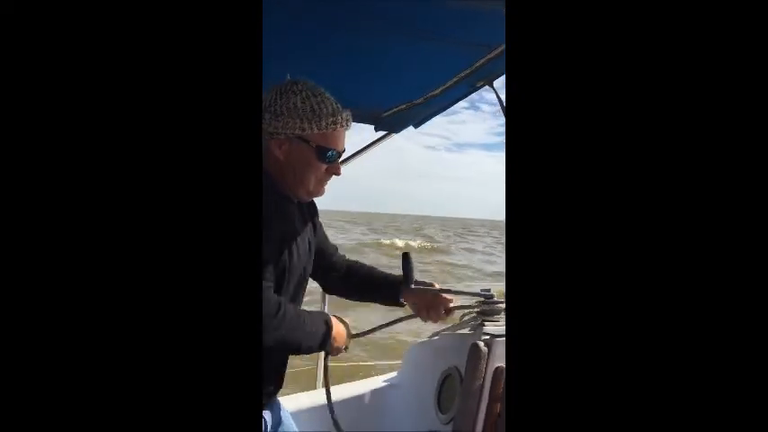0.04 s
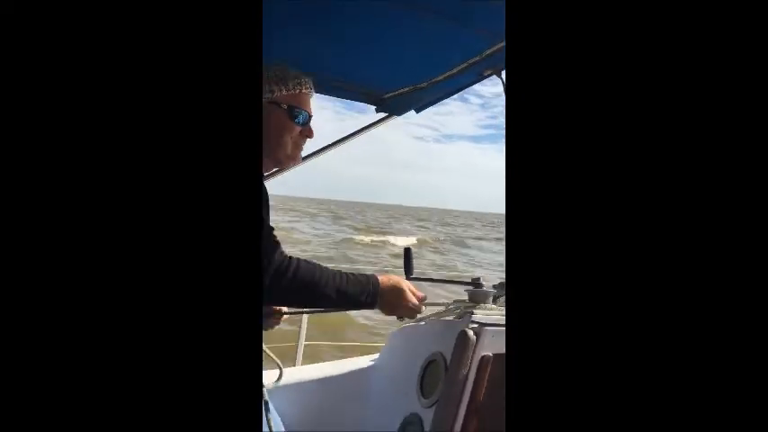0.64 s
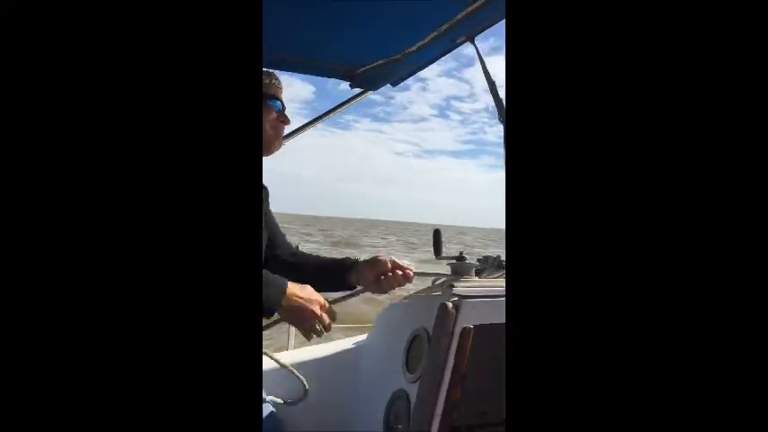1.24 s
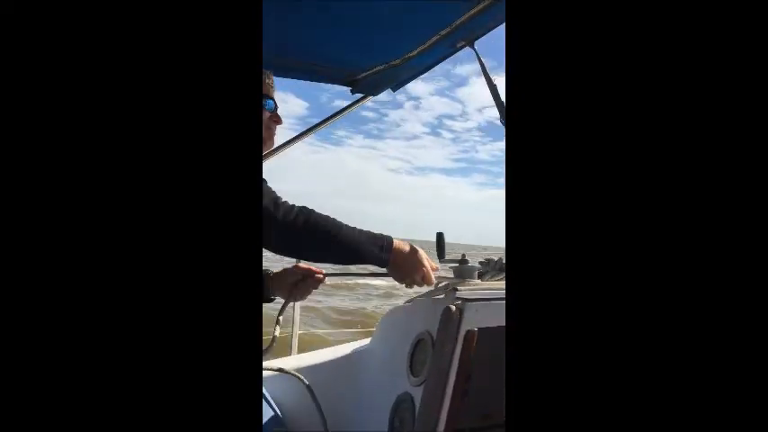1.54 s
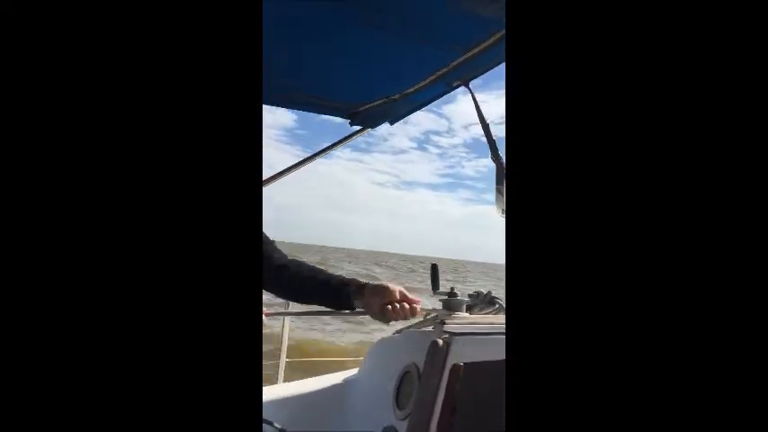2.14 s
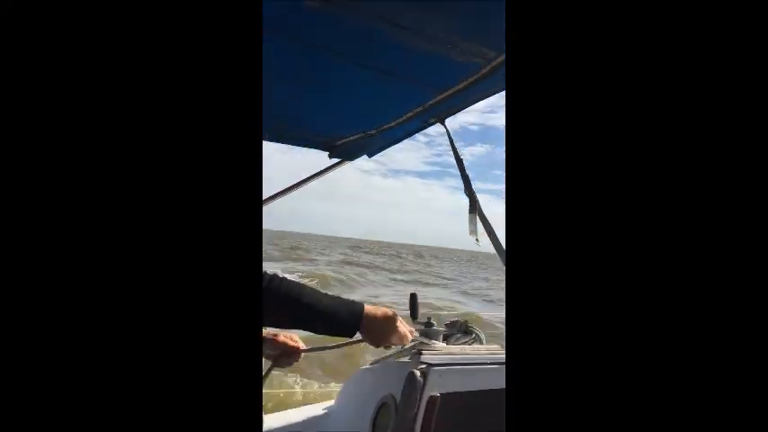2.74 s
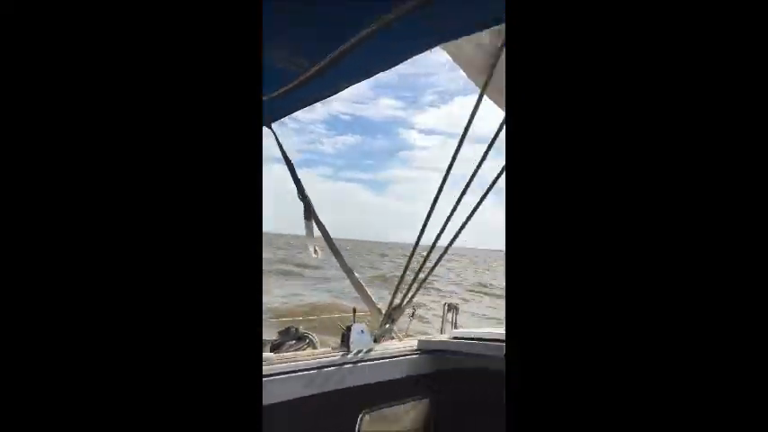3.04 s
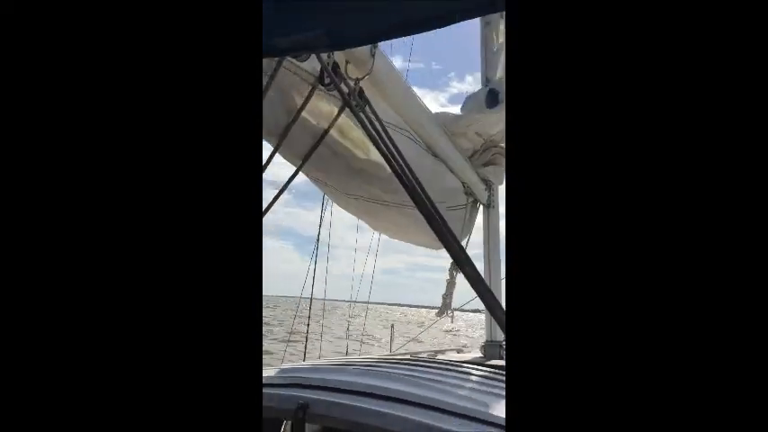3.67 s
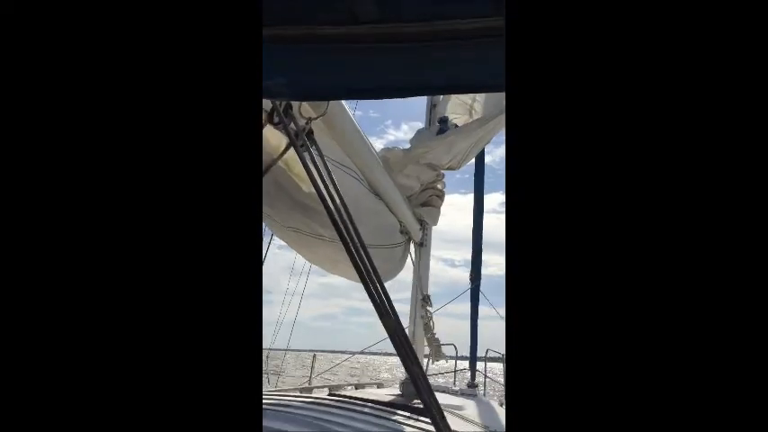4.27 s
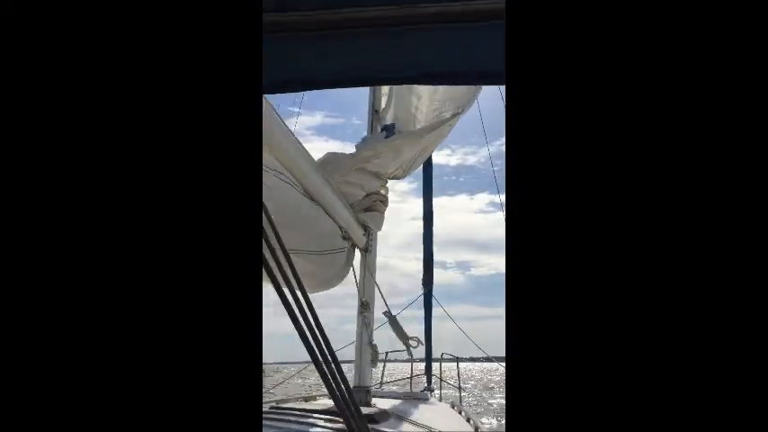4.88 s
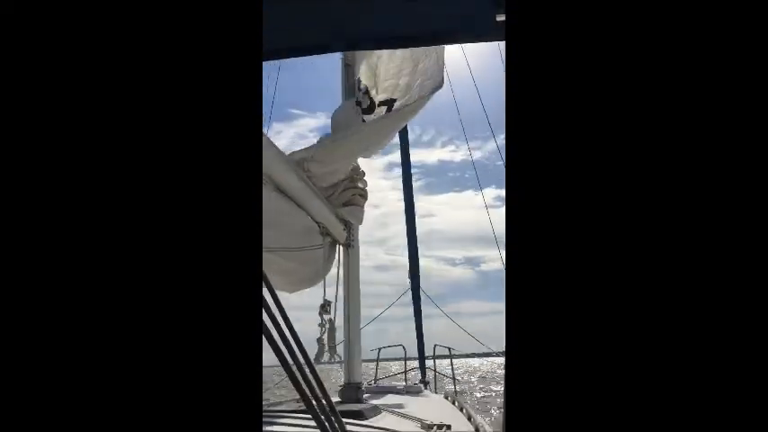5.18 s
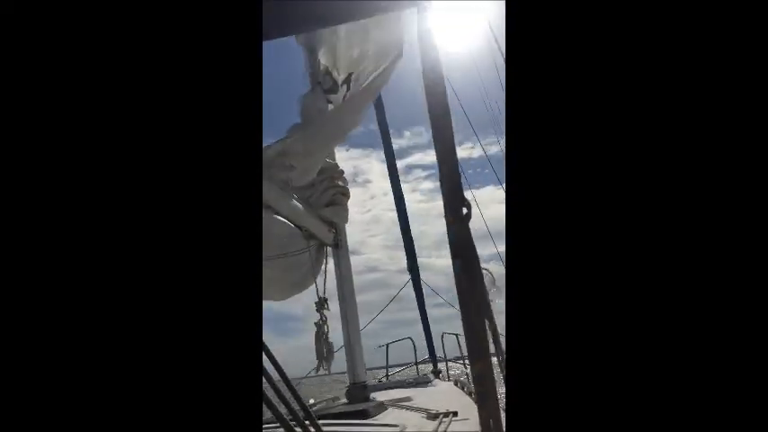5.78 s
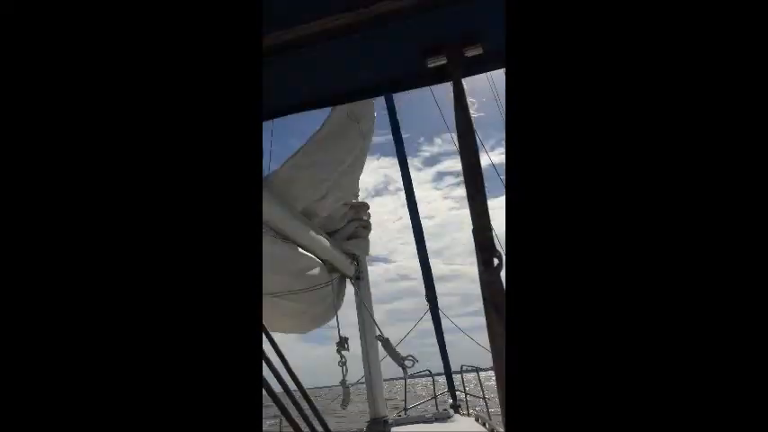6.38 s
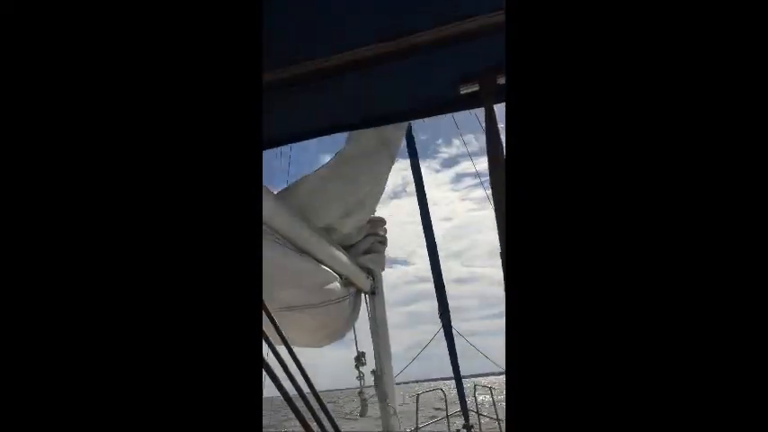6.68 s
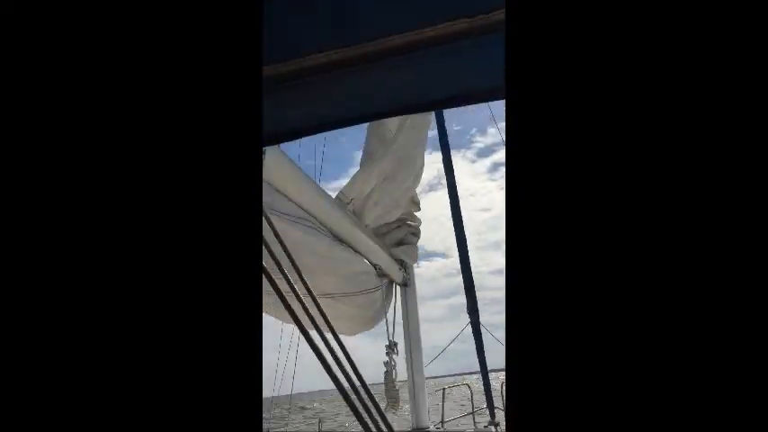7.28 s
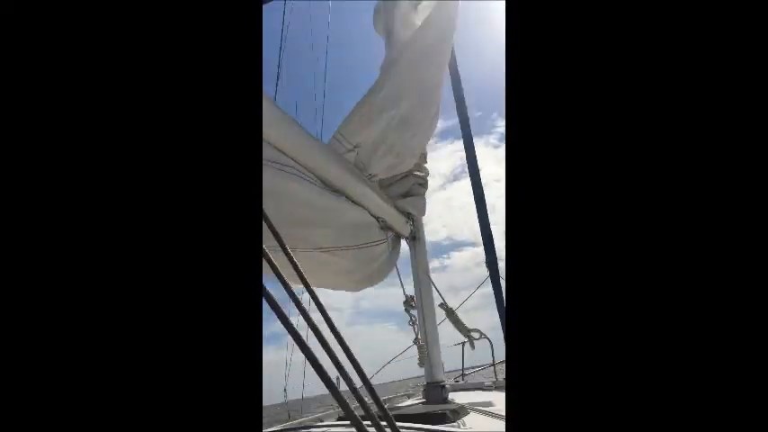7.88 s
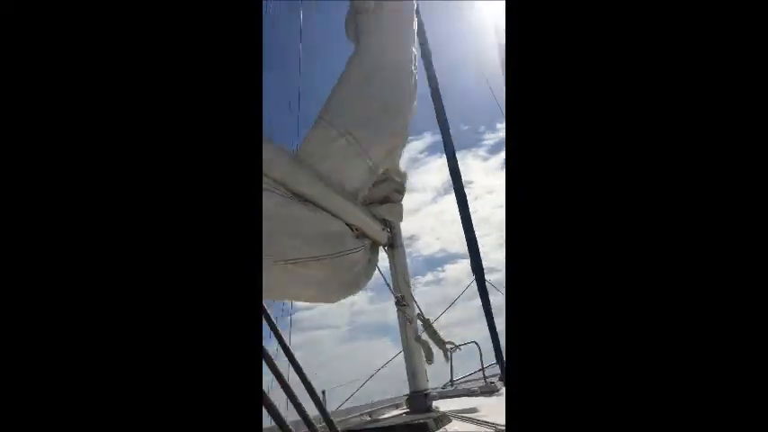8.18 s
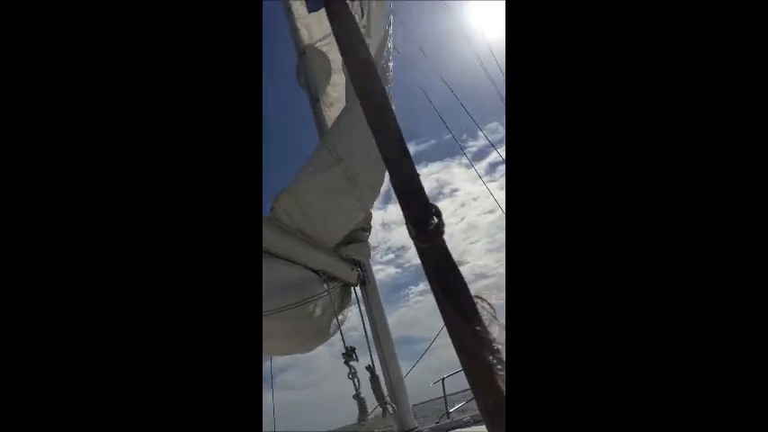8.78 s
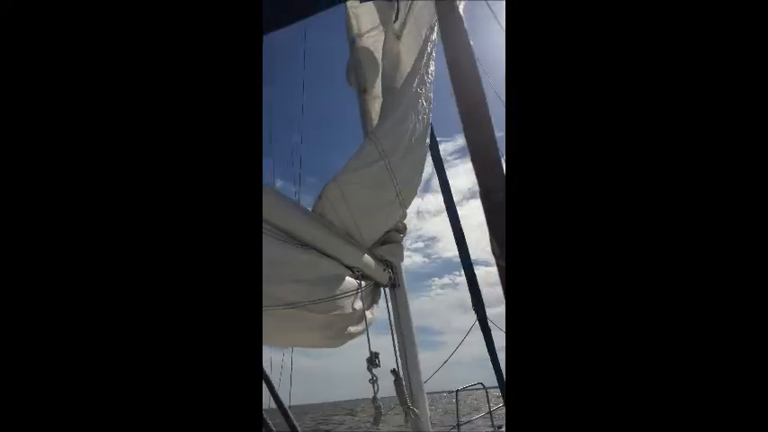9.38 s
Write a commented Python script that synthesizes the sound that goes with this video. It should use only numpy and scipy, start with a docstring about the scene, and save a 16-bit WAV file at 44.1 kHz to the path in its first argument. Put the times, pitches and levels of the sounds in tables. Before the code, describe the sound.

Repeated high, pitch-bending squeaks of a line hauled round a winch, above steady wind rumble, water wash and a slow boat engine.

```python
"""Hauling a line round a winch

A line is hauled hand over hand in the cockpit of a motoring sailboat. On each pull the rope creaks on
the drum and stick-slip makes it squeal, sagging in pitch under load; single slips tick between pulls.
Underneath, water thumps the hull and the inboard engine throbs at low revs in a wash of wind and water.
An automatic gain control sinks under the loud squeals and slowly recovers."""
import sys
import numpy as np
from scipy import signal
from scipy.fft import rfft, irfft, next_fast_len
from scipy.io import wavfile
from scipy.ndimage import uniform_filter1d

SR = 44100
rng = np.random.default_rng(int(sys.argv[2]) if len(sys.argv) > 2 else 0)


def wrap_up_sound(samples):
    """Save the sound to the file named by the first command line argument, as 16-bit audio."""
    columns = np.atleast_2d(samples).T
    # keep every value between -1 and 1, then stretch to whole-number steps
    tamed = np.clip(columns, -1, 1)
    steps = np.round(tamed * 32767).astype(np.int16)
    wavfile.write(sys.argv[1], SR, steps)


N = 415422
T = np.arange(N) / SR

# Pulls on the rope. load_curve above 1 brings the load on late; fade_db is lost by the pull's end.
# start_s, length_s, first_hz, loaded_hz, load_s, last_hz, load_curve,
# squeal_db, fade_db, shriek_s, shriek_half_width_s, shriek_db, creak_db
PULLS = [(0.44, 0.38, 2613, 2560, 0.32, 2597.0, 0.89, -20, 13.5, 0.21, 0.056, 8, -30.9),
         (1.051, 0.37, 3028, 2599, 0.24, 2952.0, 0.63, -18.5, 5.5, 0.057, 0.079, 10, -35),
         (1.47, 0.38, 3070, 2660, 0.24, 2561.0, 0.66, -14, 14.5, 0.055, 0.052, 10, -31.5),
         (1.96, 0.39, 2975.0, 2603.0, 0.22, 2915.0, 0.62, -15.5, -0.5, 0.22, 0.07, 3.5, -30.5),
         (2.422, 0.35, 3105.0, 2725, 0.26, 3000.0, 0.59, -11.5, 2.0, 0.095, 0.014, -1.5, -32.5),
         (3.06, 0.35, 3111, 2590, 0.3, 2756.0, 2.2, -17.5, -1.5, 0.096, 0.07, 14, -35.5),
         (3.63, 0.42, 3093, 2480, 0.29, 2782.0, 1.2, -9, 3, 0.071, 0.05, 5.5, -31.0),
         (5.111, 0.43, 3109, 2693, 0.3, 2915.0, 1.15, -5.5, 0.5, 0.044, 0.059, 2.5, -31.5),
         (6.044, 0.365, 3290, 2575, 0.4, 2497.0, 0.68, -12, 7, 0.18, 0.165, 14, -26),
         (7.055, 0.43, 3118, 2770, 0.34, 2979.0, 1.31, -5.5, 2.5, 0.079, 0.049, 11, -31.5),
         (8.196, 0.29, 3173.0, 2942, 0.2, 3130.0, 1.55, 7, 4, 0.029, 0.094, -6, -33.5),
         (9.139, 0.16, 3232, 3050, 0.098, 3041.0, 2.8, -14, 7, 0.059, 0.014, 10.5, -41)]
def hauling(lead_s=.02, ease_s=.02, lock_s=.004, attack_db_per_s=1449, release_db_per_s=359,
            creak_load_db=6, creak_edge_s=.026, lowest_hz=2555):
    """Load builds and eases in each pull, bending the pitch and shaping the squeal and creak levels."""
    pulls = np.array(PULLS)
    which = np.maximum(np.searchsorted(pulls[:, 0] - lead_s, T) - 1, 0)
    (start_s, length_s, first_hz, loaded_hz, load_s, last_hz, load_curve,
     squeal_db, fade_db, shriek_s, shriek_half_width_s, shriek_db, creak_db) = pulls[which].T
    t = T - start_s
    built = ease(np.clip(t / load_s, 0, 1) ** load_curve)
    eased = ease((t - load_s) / np.maximum(length_s + ease_s - load_s, ease_s))
    jolt_db, jolt_hz = jolts()
    pitch_hz = first_hz + (loaded_hz - first_hz) * built + (last_hz - loaded_hz) * eased + jolt_hz
    swell_db = shriek_db * np.exp(-((t - shriek_s) / shriek_half_width_s) ** 2)
    faded_db = fade_db * np.clip(t / length_s, 0, 1) ** 4
    edge_db = attack_db_per_s * np.maximum(lock_s - t, 0) + release_db_per_s * np.maximum(t - length_s, 0)
    squeal_db = squeal_db + swell_db - faded_db + jolt_db - edge_db
    # the creak grows with the load and gives way as the tone locks into a shriek
    creak_db = creak_db + creak_load_db * built * (1 - eased) - .35 * swell_db
    moving = np.clip(np.minimum(t, length_s - t) / creak_edge_s + 1, 0, 1)
    return np.maximum(pitch_hz, lowest_hz), squeal_db, creak_db, moving


# Jolts in the squeal: time_s, jump_db, jump_hz
JOLTS = [(1.479, 3, 62.5), (1.62, 2.5, 179), (2.508, 8, 3), (3.251, 11, 0), (3.303, 15.5, -200),
         (3.719, 15.5, 2), (3.82, -5, -100), (5.114, 9, 139), (5.18, 8, 70.5), (5.256, 12, -60),
         (5.497, 9.5, 155), (6.113, 8.5, -260), (6.245, 10, 145), (6.345, -1, -220), (7.075, 8.5, 0.5),
         (7.205, 7, 0), (7.335, -6.5, -120), (7.435, 17, 297), (8.222, 6, -110), (9.192, 1.5, -0.5)]
def jolts(level_settle_s=.019, pitch_settle_s=.0456):
    """Level and pitch lean one way as the rope binds, snap over as it lets go, and settle."""
    db, hz = np.zeros(N), np.zeros(N)
    for time_s, jump_db, jump_hz in JOLTS:
        t = T - time_s
        db += jump_db / 2 * np.sign(t) * np.exp(-np.abs(t) / level_settle_s)
        hz += jump_hz / 2 * np.sign(t) * np.exp(-np.abs(t) / pitch_settle_s)
    return db, hz


def squeal(pitch_hz, level_db, creak_db, hoarse_db=-13, split_db=-13.5, gain_db=1):
    """Stick-slip locks into a tone; the stronger the creak beside it, the more it stutters and wavers."""
    rough = np.clip((creak_db - level_db + 39) / 23, .06, 1)
    dropout, grip = stutter()
    waver = .008 * rough * grip + .004 * np.sqrt(rough) * drift(45)
    phase = 2 * np.pi * np.cumsum(pitch_hz * (1 + waver)) / SR
    # the tone fades and swells irregularly in strength and phase, the more so the rougher it is
    beating = .85 * rough
    tone = (1 + beating * flutter(55)) / np.sqrt(1 + beating ** 2) * np.exp(1j * phase)
    # under heavy creak other turns break in briefly, about a semitone above and below
    above, below = np.exp(1.075j * phase), np.exp(.955j * phase)
    tone += from_db(split_db) * rough ** 2 * (flutter(30) * above + .3 * flutter(30) * below)
    tone *= 1 + from_db(hoarse_db) * rough * flutter(200)
    tone *= 1 - np.minimum(2.8 * rough, .75) * dropout
    # the low, heavily loaded part of a pull has a rasping octave; the high part is nearly pure
    octave_db = np.interp(pitch_hz, [2550, 2800, 3100], [-14, -23, -32])
    rasp = .6 + .8 * np.sqrt(rough) * flutter(150)
    octave = from_db(octave_db) * np.abs(tone) * np.exp(2j * phase) * rasp
    envelope = uniform_filter1d(from_db(level_db + gain_db), size=128)
    return np.sqrt(2) * envelope * np.real(tone + octave)


def stutter(per_s=32, catch_s=.0027):
    """Now and then the rope catches: a brief dropout (0-1), then a new grip, held to the next catch."""
    at = slip_samples(per_s, uneven=.5)
    now = np.arange(N)
    which = np.minimum(np.searchsorted(at, now), len(at) - 1)
    gap_s = np.minimum(np.abs(at[which] - now), np.abs(at[which - 1] - now)) / SR
    grip = rng.standard_normal(2000)[which]
    return np.exp(-(gap_s / catch_s) ** 2), grip


def slip_samples(per_s, uneven):
    """Samples at which the rope lets go, unevenly spaced."""
    gaps = np.exp(uneven * rng.standard_normal(2000))
    at = (np.cumsum(gaps) / per_s * SR).astype(int)
    return at[at < N]


# Bright rasp of rope fibres, for creaks and ticks: frequency_hz, relative_db
ROPE_EQ = [(300, -29.5), (1000, -17.5), (2100, -12.5), (2700, -7), (3400, 1), (4100, -3), (4900, -12),
           (6700, -15), (8000, -23), (9500, -23.5), (12000, -34), (13500, -29), (15200, -24.5)]
def creak(level_db, slips_per_s=66, spread_db=4, rub_db=-10, t60_s=.038, gain_db=4):
    """The rope creeps in uneven jerks, each a brief burst of snapping fibres, over a steady rub."""
    at = slip_samples(slips_per_s, uneven=.45)
    slips = np.zeros(N)
    slips[at] = from_db(spread_db * np.clip(rng.standard_normal(N)[at], -2, 1.4))
    envelope = rms_one(decay(slips, t60_s)) + from_db(rub_db)
    fibres = rms_one(envelope * rng.standard_normal(N))
    return from_db(level_db + gain_db) * colour(fibres, ROPE_EQ)


# Single slips of the rope: start_s, relative_db
TICKS = [(0.0983, -23), (0.343, -12), (0.395, -13.5), (0.9038, -15.5), (0.959, -16.5), (0.9734, -17),
         (1.0095, -12), (1.1783, -7), (1.2764, -31), (1.4529, -13), (1.8525, -14), (1.9028, -10.5),
         (2.4279, -28), (2.5052, -13), (2.661, -16), (3.0684, -15), (3.2251, -8.5), (3.2543, -6),
         (3.6127, -8), (4.2564, -17), (5.0584, -15), (5.737, -16.5), (5.7664, -19), (6, -17),
         (6.4826, -15.5), (6.5854, -17), (6.6391, -13), (6.7344, -19.5), (6.9829, -14.5), (7.7614, -16),
         (8.1338, -15.5), (8.167, -16), (9.0528, -13.5)]
def ticks(t60_s=.023, gain_db=-3, snap=2.9):
    """Lone slips as the rope takes up or loses load: one snap, then a short spray of fibres."""
    slips = from_db(gain_db) * clicks(TICKS)
    spray = decay(slips, t60_s) * rng.standard_normal(N)
    return colour(snap * slips + spray, ROPE_EQ)


# Water hitting the hull: start_s, relative_db
THUMPS = [(0.075, -2.5), (0.099, -19), (5.091, -13.5), (8.179, -17), (8.886, -9), (9.19, -22)]
def hull_thumps(pitch_hz=163, t60_s=.028, gain_db=3):
    """Each blow of water rings one heavily damped mode of the hull."""
    radius, angle = from_db(-60 / (t60_s * SR)), 2 * np.pi * pitch_hz / SR
    blows = from_db(gain_db) * clicks(THUMPS) + 1e-18
    return signal.lfilter([0, -np.sin(angle)], [1, -2 * radius * np.cos(angle), radius ** 2], blows)


def engine_cycle(cycle_hz=14.69, wander=.0029):
    """Phase of the four-stroke cycle, its revs wandering slightly."""
    return 2 * np.pi * np.cumsum(cycle_hz * (1 + wander * drift(1.48))) / SR


# Harmonics of the throb: cycle_multiple, relative_db
ENGINE_ORDERS = [(2, -18.5), (3, -9.5), (4, 2.5), (5, -3), (6, -2), (7, -2), (8, -3), (9, -2.5), (11, -8),
                 (12, -20), (13, -9.5), (14, -12.5), (21, -14.5), (25, -21)]
# Fader for the engine, which is clearest aft: time_s, level_db
ENGINE_FADER = [(0, -23), (2.75, -18), (3.1, -22.5), (5, -22), (9.42, -25.5)]
def engine(cycle, waver=.44):
    """Orders of the four-stroke cycle, carried by the hull; each wavers with the load."""
    throb = np.zeros(N)
    for multiple, db in ENGINE_ORDERS:
        strength = from_db(db) * (1 + waver * drift(8.5))
        throb += strength * np.cos(multiple * cycle + rng.uniform(0, 2 * np.pi))
    return from_db(in_time(ENGINE_FADER)) * rms_one(throb)


# Swells of the wind: time_s, relative_db
GUSTS = [(0, -26.5), (2.7, -26.5), (3.3, -22), (5, -22.5), (6.4, -22), (6.95, -20.5), (7.3, -24.5),
         (8.1, -20.5), (9.42, -25)]
# Bass-heavy tone of the wind: frequency_hz, relative_db
WIND_EQ = [(8, -40.5), (22, -12.5), (35, -28), (55, -2.5), (110, 1), (180, -3), (260, -12.5), (380, -27.5),
           (900, -59), (5000, -89.5)]
def wind(buffet_db=3):
    """A low rumble that buffets quickly within slower gusts."""
    buffeting = rng.standard_normal(N) * from_db(buffet_db * drift(15))
    return from_db(in_time(GUSTS)) * colour(buffeting, WIND_EQ)


# Midrange rush of the water: frequency_hz, relative_db
WASH_EQ = [(200, 2), (330, 5.5), (480, 2), (630, 6.5), (800, -1), (1100, -3), (2100, -3), (3300, 5),
           (3900, -8), (5500, -18), (7500, -35), (8800, -36.5), (9600, -35.5), (11000, -48.5)]
def water_wash(cycle, pulse_depth=.046, flicker_db=1.59, gain_db=-28):
    """A steady wash of water that flickers and pulses slightly with the engine's firings."""
    pulsing = 1 + pulse_depth * np.cos(2 * cycle)   # two firings a cycle
    rush = rng.standard_normal(N) * pulsing * from_db(flicker_db * drift(42))
    return from_db(gain_db) * colour(rush, WASH_EQ)


def from_db(db):
    """Decibels to gain."""
    return 10 ** (np.asarray(db) / 20)


def rms_one(x):
    """Scale to unit rms."""
    return x / np.sqrt(np.mean(np.abs(x) ** 2) + 1e-20)


def in_time(rows):
    """Join (time_s, value) points into a curve at every sample."""
    return np.interp(T, *np.transpose(rows))


def ease(share):
    """Smooth step from 0 to 1."""
    return np.sin(np.pi / 2 * np.clip(share, 0, 1)) ** 2


def drift(rate_hz):
    """Smooth random motion of unit rms, mostly slower than rate_hz."""
    size = next_fast_len(N, real=True)
    hz = np.arange(size // 2 + 1) * SR / size
    spectrum = rfft(rng.standard_normal(size)) / (1 + (hz / rate_hz) ** 2)
    return rms_one(irfft(spectrum, size)[:N])


def flutter(rate_hz):
    """Random motion in both strength and phase, of unit power."""
    return (drift(rate_hz) + 1j * drift(rate_hz)) / np.sqrt(2)


def colour(x, eq, size=8192):
    """Minimum-phase filter with the given EQ curve and unit power gain."""
    hz, level_db = np.transpose(eq)
    grid_hz = np.maximum(np.arange(size // 2 + 1) * SR / size, 1)
    gain = from_db(np.interp(np.log(grid_hz), np.log(hz), level_db))
    cepstrum = irfft(np.log(gain))
    cepstrum[1:size // 2] *= 2
    cepstrum[size // 2 + 1:] = 0
    response = irfft(np.exp(rfft(cepstrum)))
    return signal.fftconvolve(x, response / np.linalg.norm(response))[:N]


def clicks(rows):
    """One click for each (start_s, level_db)."""
    out = np.zeros(N)
    for start_s, level_db in rows:
        out[round(start_s * SR)] = from_db(level_db)
    return out


def decay(x, t60_s):
    """Give each click an exponential tail."""
    return signal.lfilter([1], [1, -from_db(-60 / (t60_s * SR))], x + 1e-18)


def cockpit(x, t60_s, wet_db):
    """The cockpit adds a short, dense tail of reflections."""
    t = T[:SR // 4]
    tail = rng.standard_normal(len(t)) * from_db(-60 * t / t60_s)
    return x + from_db(wet_db) * signal.fftconvolve(x, tail / np.linalg.norm(tail))[:N]


def scene():
    """The rope sounds a step away, over a bed of wind, water and engine."""
    pitch_hz, squeal_db, creak_db, moving = hauling()
    fibres = cockpit(moving * creak(creak_db) + ticks(), t60_s=.034, wet_db=-1)
    squeals = cockpit(squeal(pitch_hz, squeal_db, creak_db), t60_s=.1, wet_db=-14)
    cycle = engine_cycle()
    bed = wind() + water_wash(cycle) + engine(cycle)
    return (squeals + fibres + hull_thumps() + bed)[None]


def gain_control(x, threshold_db=-12, strength=1.99, attack_s=.36, release_db_per_s=21):
    """The gain sinks while the sound is over the threshold, then climbs back at a limited rate."""
    level_db = 10 * np.log10(np.maximum(uniform_filter1d(x ** 2, size=1024), 1e-12))
    pole = np.exp(-1 / (attack_s * SR))
    cut_db = signal.lfilter([1 - pole], [1, -pole], strength * np.maximum(level_db - threshold_db, 0))
    held_db = np.maximum.accumulate(cut_db + release_db_per_s * T, axis=-1) - release_db_per_s * T
    return x * from_db(-held_db)


def record(dry, ceiling=.92, knee=6, cutoff_hz=15900):
    """Gain control, a soft clip that rounds off the loudest squeals, then a steep high cut."""
    x = gain_control(dry)
    rounded = x / (1 + np.abs(x / ceiling) ** knee) ** (1 / knee)
    low_pass = signal.ellip(10, .1, 70, cutoff_hz, fs=SR, output="sos")
    return signal.sosfilt(low_pass, rounded)


dry = scene()
out = record(dry)
wrap_up_sound(out)
```